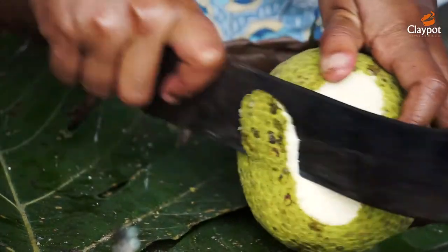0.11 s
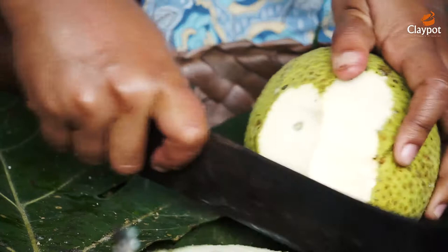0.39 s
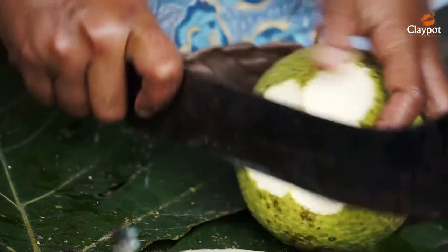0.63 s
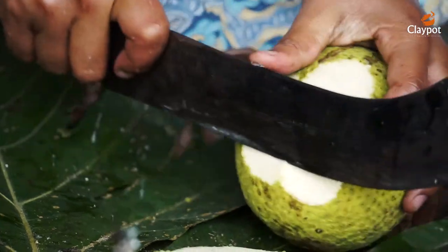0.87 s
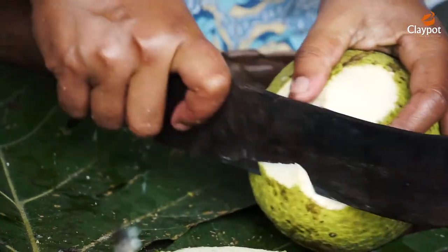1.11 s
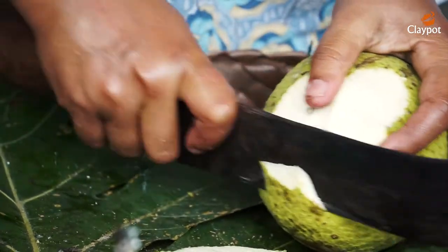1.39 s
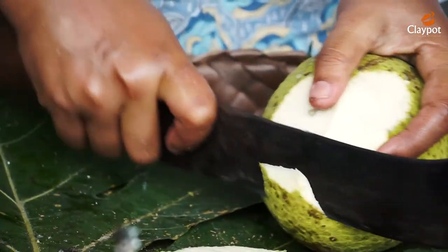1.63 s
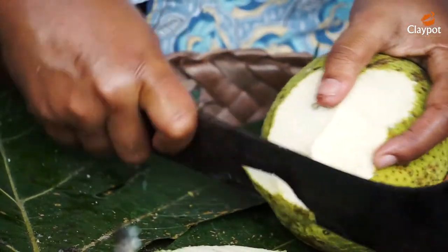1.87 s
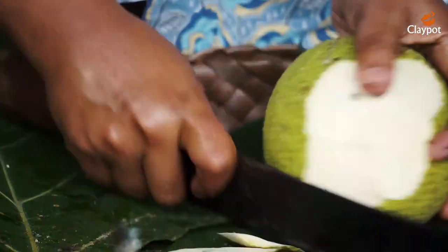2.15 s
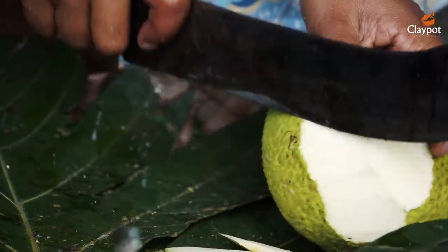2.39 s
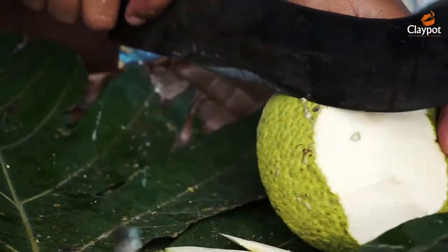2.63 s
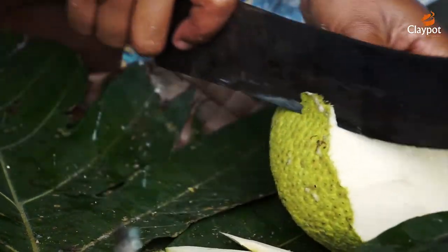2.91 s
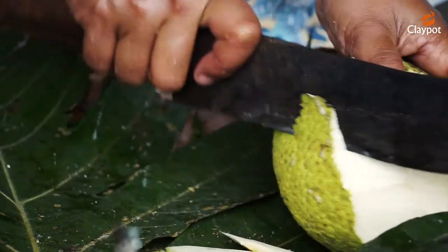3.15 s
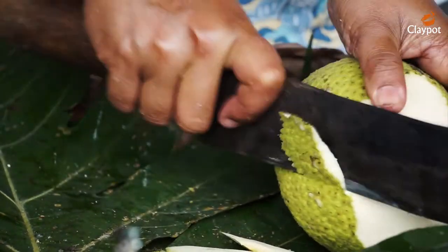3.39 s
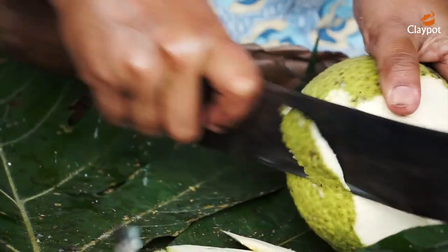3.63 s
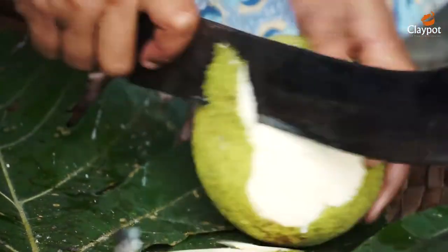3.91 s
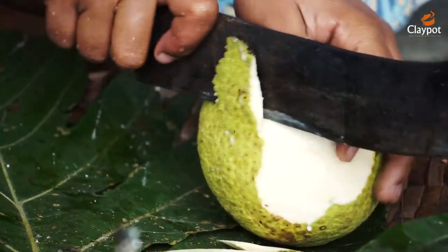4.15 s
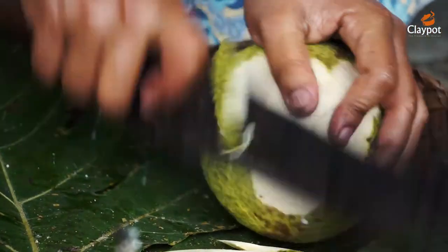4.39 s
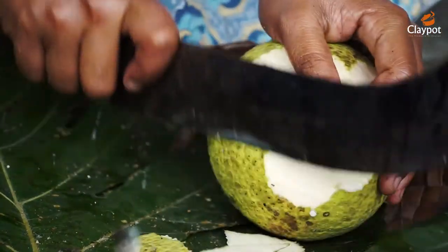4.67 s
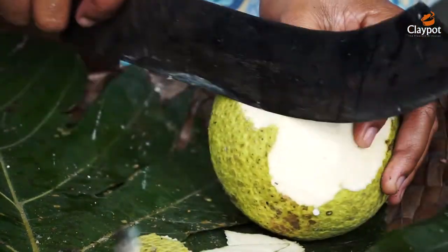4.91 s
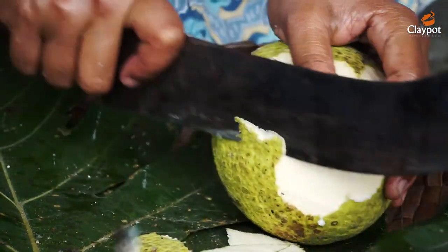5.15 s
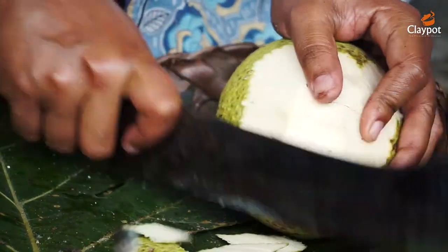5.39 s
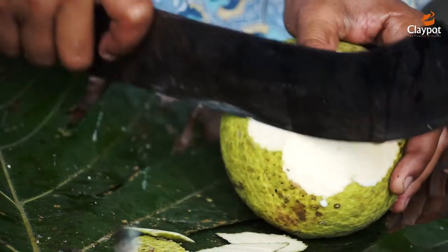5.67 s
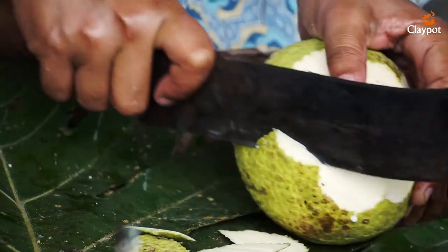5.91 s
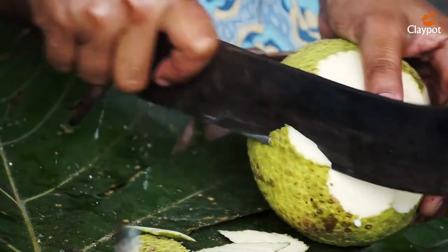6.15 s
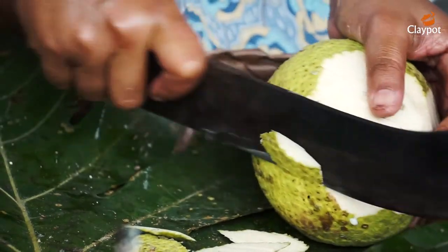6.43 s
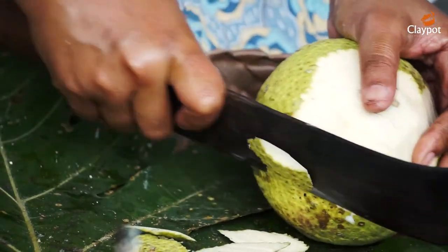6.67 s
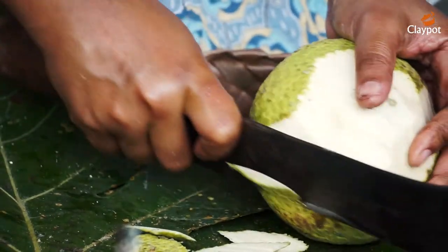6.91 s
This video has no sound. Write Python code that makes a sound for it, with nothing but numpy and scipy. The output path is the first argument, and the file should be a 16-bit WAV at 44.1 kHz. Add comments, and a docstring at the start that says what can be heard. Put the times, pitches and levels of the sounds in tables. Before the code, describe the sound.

Outdoors, a dense high insect chorus flutters steadily over soft air hiss, wide around a close stereo microphone. A faint low coo opens, with light rind ticks and a scrape around 0.4 s. Hoarse whining notes, perhaps birds or insects, repeat from 0.8 to 2.6 s, with squeaks near 1.1 s and chopped cricket trills at 1.5, 2.0 and 2.5 s. A faint drone swells near 1 s. At 2.0 s the knife tears a slice with a crunchy snap, then crackles until 2.3 s. From 3 to 5.5 s the steel whines hoarsely. A short frog croak comes from the left at 3.4 s, snaps at 3.9, the loudest crack and dull thud at 4.47. A coo and second croak come around 5.1 s, another strong rip at 5.3. Afterwards cutting quiets; a distant drone rises near 6, a last croak at 6.6, cricket trills at 6.5 and 7 s.

```python
"""Insects fill the treble, a low coo swells far off and a hoarse groan near 900 Hz wavers behind.
Outdoors, close to a stereo microphone, a broad steel knife pares the rind off a firm fruit: torn cells rasp
as clumpy noise, the gliding steel sings as narrow hoarse bands, slices crack free and jolt the fruit's modes.
Hoarse notes near 3 kHz and 2.1 kHz, perhaps birds or insects, are narrow noise; a cricket trills in chopped
tones, a frog on the left croaks three times by pulsing a vocal sac, a harmonic drone passes, air hisses."""
import sys
import numpy as np
from scipy import signal
from scipy.fft import rfft, irfft, next_fast_len
from scipy.io import wavfile
from scipy.ndimage import map_coordinates

SR = 44100
rng = np.random.default_rng(int(sys.argv[2]) if len(sys.argv) > 2 else 0)


def transcribe(signal):
    """Save signal, clipped to [-1, 1], as a 16-bit WAV file at the path in sys.argv[1]."""
    frames = np.atleast_2d(signal).T
    limited = np.clip(frames, -1, 1)
    pcm = np.round(limited * 32767).astype(np.int16)
    wavfile.write(sys.argv[1], SR, pcm)


def natural_amplitude(level_db):
    """Convert a level in decibels to a linear amplitude factor, elementwise."""
    exponent = np.asarray(level_db, float) / 20
    return 10 ** exponent


N = 310905  # samples
T = np.arange(N) / SR  # s
SLOW = T[::32]  # control times, s


def unit(x):
    """Scaled to rms 1."""
    return x / np.sqrt(np.mean(x ** 2) + 1e-20)


def along(points, hz):
    """(frequency [Hz], value) points read on a log frequency axis."""
    f, v = np.transpose(points)
    return np.interp(np.log(hz + 1), np.log(f + 1), v)


def curves(rows):
    """One value per sample for each column after the time."""
    s, *cols = np.transpose(rows)
    return [np.interp(T, s, c) for c in cols]


def sounding(rows, fade):
    """1 between the first and last row, fading at both ends over fade seconds."""
    return np.clip(np.minimum(T - rows[0][0], rows[-1][0] - T) / fade, 0, 1)


def swells(rows):
    """Summed gain of (peak s, dB, rise s, fall s, value) events, and their value weighted by gain."""
    s, db, rise, fall, value = np.transpose(rows)[..., None]
    below_peak_db = 20 * np.maximum((s - SLOW) / rise, (SLOW - s) / fall)
    gain = natural_amplitude(np.maximum(db - below_peak_db, -300))
    total = gain.sum(0)
    return np.interp(T, SLOW, total), np.interp(T, SLOW, (gain * value).sum(0) / total)


def wobble(rate):
    """A smooth random curve, rate knots a second."""
    knots = rng.standard_normal(int(N * rate / SR) + 4)
    return np.interp(T, SLOW, map_coordinates(knots, [SLOW * rate]))


def filtered(x, response):
    """x filtered by a complex response of frequency."""
    m = next_fast_len(x.shape[-1] + 8192)
    spectrum = rfft(x, m) * response(np.fft.rfftfreq(m, 1 / SR))
    return irfft(spectrum, m)[..., :x.shape[-1]]


def modes(table):
    """Causal sum of (Hz, width Hz, dB) resonances with alternating signs."""
    def response(f):
        return sum((-1) ** k * natural_amplitude(db) * 1j * f * w / (c * c - f * f + 1j * f * w)
                   for k, (c, w, db) in enumerate(table))
    return response


def grit(shape, spread_db):
    """Dense clicks of uneven size."""
    return unit(rng.standard_normal(shape) * natural_amplitude(spread_db * rng.standard_normal(shape)))


# colour bands: edges [Hz], and each band's octaves from 4.5 kHz
BAND_EDGES_HZ, BAND_OCTAVES = [0, 700, 2000, 6000, SR], [-3, -2, 0, 1]


def tilted(x, tilt_db):
    """Rebalances four bands so the colour leans by about tilt_db per octave around 4.5 kHz."""
    edges = zip(BAND_EDGES_HZ, BAND_EDGES_HZ[1:])
    bands = filtered(x, lambda hz: np.array([(hz >= lo) & (hz < hi) for lo, hi in edges]))
    return sum(natural_amplitude(o * tilt_db) * band for o, band in zip(BAND_OCTAVES, bands))


# colour of tearing rind: (frequency [Hz], relative level [dB per Hz])
RIND_COLOUR = [(90, -53), (160, -16.5), (400, -9.5), (1000, -2), (3000, 1), (6000, -3), (9000, -2),
               (11500, -5.5)]
# edge resting in the rind between strokes: (time [s], level before flutter and tilt [dB])
CONTACT = [(0, -67), (.7, -68), (.9, -63), (1.3, -65), (1.9, -66), (2.5, -61), (2.9, -68), (3.4, -61),
           (3.7, -63), (4.05, -62), (4.3, -66), (4.65, -63), (4.95, -68), (5.5, -61), (5.7, -64),
           (6.15, -68), (7.05, -64)]
CONTACT_TILT_DB = 1.2  # per octave
# strokes of the edge through rind, levels before flutter and tilt:
# (peak time [s], level [dB], 20 dB rise [s], 20 dB fall [s], brightness [dB per octave])
STROKES = [(.38, -56, .15, .25, -2), (.57, -62, .04, .1, 0), (1.36, -63, .08, .1, 1),
           (2.015, -39.5, .04, .055, -1.5), (2.2, -52.5, .15, .09, 0), (2.3, -53, .04, .07, 2),
           (3.83, -54, .07, .08, 5), (3.945, -53, .05, .05, 2), (4.418, -49, .02, .035, 1),
           (4.478, -37, .03, .025, -3), (4.57, -49, .04, .04, -1), (5.14, -49, .11, .22, 1.5),
           (5.32, -34.5, .04, .035, -2.5), (5.43, -60, .08, .2, 0), (6.64, -60, .2, .1, 0)]


def rasp():
    """Cells of rind tear in clumps under the edge."""
    strokes, stroke_tilt_db = swells(STROKES)
    resting = natural_amplitude(curves(CONTACT)[0])
    tilt_db = (strokes * stroke_tilt_db + resting * CONTACT_TILT_DB) / (strokes + resting)
    tearing = unit(filtered(grit(N, spread_db=3.5), lambda hz: natural_amplitude(along(RIND_COLOUR, hz))))
    return (strokes + resting) * natural_amplitude(1.94 * wobble(70)) * tilted(tearing, tilt_db)


def small_body(x):
    """A small fruit radiates little deep bass."""
    return filtered(x, lambda hz: (1j * hz / (120 + 1j * hz)) ** 3)


# fibres snapping, crunch relative to its snap:
# (time [s], level before colouring [dB], treble tilt [dB per octave], crunch [dB], flap ring [Hz])
SNAPS = [(0.353, -47, 0, -12, 2000), (0.368, -50, 5, -12, 9000), (0.386, -43.5, -1, -10, 2210),
         (0.4294, -48, 1, -10, 7100), (0.5744, -56, 1, -4, 7000), (0.98, -55, -5.5, -6.5, 3080),
         (1.9976, -38, 6, -8, 1325), (2.0049, -33.5, 3, -6.5, 9700), (2.1519, -46.5, 2, -9, 6750),
         (2.2042, -49, -4, -5.5, 942), (2.2184, -38.5, -1, -7.5, 2650), (2.2404, -44.5, -3.5, -9, 2810),
         (2.2915, -41, 0.5, -6, 4050), (2.305, -40.5, 2, -6, 9000), (3.8143, -49.5, 9, -2.5, 3146),
         (3.9065, -39, 0, -9, 3804), (3.9373, -34.5, -1, -11.5, 2710), (4.4079, -39.5, 6.5, -3.5, 9800),
         (4.4574, -41.5, 5.5, -0.5, 9070), (4.4683, -19.5, 1, -9.5, 1390), (4.5627, -53, 2, -4, 8660),
         (4.57, -51, -2, -6, 1000), (5.1517, -38.5, 3, -13, 2700), (5.3012, -42, -3, -9, 5700),
         (5.3073, -34, 5, -15, 6140), (5.3153, -23, 6.5, -11, 2194)]


def snaps():
    """Each snap is a crack that swells and dies in milliseconds, then a crackling crunch."""
    cracks, t = np.zeros(N + SR), np.arange(SR // 5) / SR
    for s, db, tilt_db, crunch_db, ring_hz in SNAPS:
        crack = t / 0.0017 * np.exp(1 - t / 0.0012)
        crunch = natural_amplitude(crunch_db - 60 * t / 0.1) * (1 - np.exp(-t / 0.00087))
        flap = modes([(ring_hz, .2 * ring_hz, 7)])  # the loose flap of rind rings

        def colour(hz):
            lean_db = tilt_db * np.take(BAND_OCTAVES, np.searchsorted(BAND_EDGES_HZ[1:], hz))
            return natural_amplitude(along(RIND_COLOUR, hz) + lean_db) * (1 + flap(hz))

        burst = (crack + crunch) * rng.standard_normal(len(t))
        cracks[round(s * SR):][:len(t)] += natural_amplitude(db) * filtered(burst, colour)
    return small_body(cracks[:N])


# the fruit jolts as a slice breaks free: (time [s], level before the modes [dB])
JOLTS = [(1.9976, -50), (2.0049, -59), (4.4683, -42.5), (5.3073, -52), (5.3153, -43)]
# modes of the fruit: (frequency [Hz], mean relative level [dB], t60 [s])
FRUIT_MODES = [(176.6, 4, 0.13), (242, -3.5, 0.18), (409.6, 7.5, 0.068), (497, 7.5, 0.054), (755, 5, 0.065),
               (950, 21, 0.023), (1338, 18, 0.02)]


def jolts():
    """Each jolt rings the fruit's damped modes as a dull thud."""
    thuds, t = np.zeros(N + SR), np.arange(SR // 5) / SR
    for s, db in JOLTS:
        thud = sum(natural_amplitude(level + rng.normal(0, 1.4) - 60 * t / t60) * np.sin(2 * np.pi * hz * t)
                   for hz, level, t60 in FRUIT_MODES)
        thuds[round(s * SR):][:len(t)] += natural_amplitude(db) * thud * (1 - np.exp(-t / 0.0021))
    return small_body(thuds[:N])


def hoarse(gain, hz, width_hz):
    """Narrow noise whose centre glides; width is taken at half amplitude."""
    noise = rng.standard_normal((2, N))
    a, b = filtered(noise, lambda f: 1 / (1 + (2 * f / width_hz) ** 2))
    phase = 2 * np.pi * np.cumsum(hz) / SR
    return gain * natural_amplitude(1.5 * wobble(30)) * unit(a * np.cos(phase) + b * np.sin(phase))


# whine of the long deep cut: (time [s], level before flutter [dB], centre [Hz])
DEEP_WHINE = [(2.95, -76, 3250), (3.03, -67, 3250), (3.2, -62.5, 3160), (3.4, -61, 3150), (3.65, -67, 2950),
              (3.9, -58, 2950), (4.08, -61.5, 2950), (4.28, -59, 3050), (4.41, -70, 3100),
              (4.54, -56, 3050), (4.68, -68, 2880), (4.85, -56.5, 2970), (4.99, -67, 2990),
              (5.1, -54, 3020), (5.22, -62, 3000), (5.35, -59, 3080), (5.9, -76, 3050)]
DEEP_OCTAVE_DB = -6  # its overtone, relative
# hoarse high hiss of the blade, levels before flutter:
# (peak time [s], level [dB], 20 dB rise [s], 20 dB fall [s], centre [Hz])
HISS = [(.88, -68, .2, .5, 4300), (1.34, -70, .4, .3, 4550), (2.37, -60.5, .05, .3, 4720),
        (5.2, -60, .2, .2, 4150), (5.53, -65, .4, .4, 4750)]


def blade():
    """Stick and slip makes the steel sing in the long deep cut, a broad whine with an overtone, and hiss."""
    deep_db, deep_hz = curves(DEEP_WHINE)
    gain = natural_amplitude(deep_db) * sounding(DEEP_WHINE, fade=.03)
    deep = hoarse(gain, deep_hz, width_hz=520)
    overtone = natural_amplitude(DEEP_OCTAVE_DB) * hoarse(gain, 2 * deep_hz, width_hz=1100)
    return deep + overtone + hoarse(*swells(HISS), width_hz=650)


# short hoarse notes near 3 kHz, perhaps a bird or insect, levels before flutter:
# (peak time [s], level [dB], 20 dB rise [s], 20 dB fall [s], centre [Hz])
WHINING_NOTES = [(.3, -69, .1, .3, 3050), (.83, -65, .1, .15, 3230), (.97, -63.5, .07, .17, 3200),
                 (1.17, -63, .1, .2, 2966), (1.37, -58, .05, .22, 2945), (1.6, -57, .12, .17, 2820),
                 (1.81, -57, .09, .2, 2840), (2.19, -66, .2, .2, 2760), (2.4, -64, .12, .2, 2850),
                 (2.6, -66.5, .2, .5, 2770), (6.4, -70, .3, .3, 3100), (6.7, -64, .08, .2, 2920),
                 (6.9, -66.5, .15, .15, 2950)]


def whining_notes():
    """Short hoarse whining notes near 3 kHz, perhaps a bird or insect, as narrow swelling noise."""
    return hoarse(*swells(WHINING_NOTES), width_hz=330)


# hoarse squeaks near 2.1 kHz, probably a bird, levels before flutter:
# (peak time [s], level [dB], 20 dB rise [s], 20 dB fall [s], centre [Hz])
BIRD_SQUEAKS = [(1.045, -56, .04, .2, 2200), (1.14, -56.5, .12, .25, 2090), (1.26, -60, .2, .09, 2085),
                (5.1, -61, .05, .3, 2080), (5.38, -63, .3, .3, 2170)]


def bird_squeaks():
    """Hoarse squeaks near 2.1 kHz, probably a bird, as very narrow swelling noise."""
    return hoarse(*swells(BIRD_SQUEAKS), width_hz=130)


UPPER_HZ = (2850, 3500)  # upper resonance at start and peak
UPPER_DB = (-3, 1.5, 0)  # over the sac at start, three quarters of the build-up, peak
CROAK_RISE_DB, CROAK_LAST_DB = 22, 8  # swell over the whole build-up, and over its last quarter
CROAK_CUT_S = .013  # to fall 20 dB


def croak(s, db, build):
    """A croak swells while its upper resonance rises, then cuts off: rows of (s, dB, upper dB, upper Hz)."""
    low, high = UPPER_HZ
    return [(s - build - .005, -120, UPPER_DB[0], low),
            (s - build, db - CROAK_RISE_DB, UPPER_DB[0], low),
            (s - build / 4, db - CROAK_LAST_DB, UPPER_DB[1], high - (high - low) / 5),
            (s, db, UPPER_DB[2], high),
            (s + 4 * CROAK_CUT_S, db - 80, UPPER_DB[2], high)]


# croaks: (peak time [s], vocal sac level before placing [dB], build-up [s])
CROAKS = [(3.398, -39, .065), (5.085, -35.5, .09), (6.635, -37, .12)]
# vocal sac, before its response is squared: (frequency [Hz], width [Hz], relative level [dB])
SAC = [(1410, 390, 1), (1774, 630, 0)]
PULSES_HZ = 255  # mean throat pulse rate


def frog():
    """Throat pulses ring the vocal sac and an upper resonance that rises through the croak."""
    db, upper_db, upper_hz = curves([row for call in CROAKS for row in croak(*call)])
    cycle = np.cumsum(PULSES_HZ * (1 + .06 * wobble(100))) / SR
    pulses = np.diff(np.floor(cycle), prepend=0) * natural_amplitude(2 * wobble(200))
    source = unit(pulses) + .2 * rng.standard_normal(N)
    upper = 0
    for hz in (2800, 3150, 3500):  # cross-fading fixed resonances moves the pitch
        ring = unit(filtered(source, lambda f: modes([(hz, 620, 0)])(f) ** 4))
        upper = upper + np.clip(1 - np.abs(upper_hz - hz) / 450, 0, 1) * ring
    sac = unit(filtered(source, lambda f: modes(SAC)(f) ** 2))
    return natural_amplitude(db) * (sac + natural_amplitude(upper_db) * upper)


# one cricket's trills, levels before flutter:
# (start [s], length [s], second partial's peak level [dB], first partial over second [dB])
TRILLS = [(1.46, .26, -58, 3), (2.04, .14, -55.5, 3), (2.53, .24, -58, 1), (6.43, .18, -55.5, -1),
          (6.92, .2, -58, 1)]
CRICKET_HZ = 2780  # mean of the first partial


def cricket():
    """A slightly hoarse two-partial note chopped into about thirty pulses a second, swelling in each trill."""
    first, second = np.zeros((2, N))
    for s, length, db, first_db in TRILLS:
        chop = np.sin(np.pi * 29.3 * (SLOW - s)) ** 4
        swell = np.abs(np.sin(np.pi * np.clip((SLOW - s) / length, 0, 1))) ** .4
        gain = natural_amplitude(db) * np.interp(T, SLOW, swell * chop)
        first, second = first + natural_amplitude(first_db) * gain, second + gain
    phase = 2 * np.pi * np.cumsum(CRICKET_HZ * (1 + 0.00837 * wobble(120))) / SR
    return natural_amplitude(3.1 * wobble(25.04)) * (first * np.sin(phase) + second * np.sin(2 * phase))


# low hoarse groan in the background: (time [s], level before flutter [dB])
GROAN = [(0, -62), (.17, -73), (.37, -65), (.7, -82), (1.16, -62), (1.4, -73), (1.65, -70), (2, -78),
         (2.22, -64), (2.45, -68), (2.8, -71), (3.1, -79), (3.82, -90), (3.93, -67), (4.3, -84), (4.5, -62),
         (4.64, -63), (4.85, -85), (5.12, -67), (5.7, -69), (6.14, -72), (6.34, -63.5), (6.66, -72),
         (6.95, -67), (7.05, -70)]
GROAN_HZ = 905  # mean centre


def groan():
    """A low hoarse groan near 900 Hz, source unknown: narrow noise that wavers in pitch and level."""
    return hoarse(natural_amplitude(curves(GROAN)[0]), GROAN_HZ * (1 + .04 * wobble(6)), width_hz=254)


def tones(tables, partials, waver):
    """Slightly unsteady harmonic tones along pitch curves."""
    out = np.zeros(N)
    for rows in tables:
        fade = sounding(rows, fade=.06)
        on = fade > 0
        hz, db = curves(rows)
        phase = 2 * np.pi * np.cumsum((hz * (1 + waver * wobble(25)))[on]) / SR
        stack = sum(natural_amplitude(level + 3.5 * wobble(10)[on]) * np.sin(k * phase) for k, level in partials)
        out[on] += natural_amplitude(db[on]) * fade[on] * stack
    return out


# far drone: (start [s], time to the top [s], time after it [s], top pitch [Hz], top level before partials [dB])
DRONES = [(.87, .25, .5, 143.5, -86), (5.58, .4, 1.2, 147, -83)]
# its partials: (multiple of the pitch, mean relative level [dB])
DRONE_TONES = [(1, -3.5), (2, -11), (3, -8), (4, -11.5), (5, 11.5), (6, -10), (7, 9)]
DRONE_START_HZ, DRONE_SAG_HZ_PER_S = 117, 19
DRONE_RISE_DB, DRONE_FADE_DB_PER_S = 12, 4


def drone():
    """Harmonic tones whose pitch and level climb to a top, then sag."""
    tables = [[(s, DRONE_START_HZ, db - DRONE_RISE_DB),
               (s + up, hz, db),
               (s + up + down, hz - DRONE_SAG_HZ_PER_S * down, db - DRONE_FADE_DB_PER_S * down)]
              for s, up, down, hz, db in DRONES]
    return tones(tables, DRONE_TONES, waver=0.00603)


# low coo: (start [s], length [s], mean pitch [Hz], level at its end before fade and flutter [dB])
COOS = [(0, .34, 338, -72), (4.99, .31, 335, -72)]
COO_SWELL_DB = 11


def coo():
    """A single tone on a level pitch that swells towards its end."""
    tables = [[(s, hz, db - COO_SWELL_DB), (s + length, hz, db)] for s, length, hz, db in COOS]
    return tones(tables, [(1, 0)], waver=0.019)


# likeness of left and right in the open: (frequency [Hz], correlation)
ALIKE = [(60, 1), (130, 0.67), (270, -0.11), (2500, -0.77), (5300, -0.46), (11000, -0.11)]
# left over right in the open: (frequency [Hz], level [dB])
LEAN = [(100, 0.16), (600, -1.6), (3000, 0.68), (11000, -2.3)]


def wide(colour):
    """A diffuse stereo field of the given colour, scaled to rms 1."""
    size = next_fast_len(N)
    hz = np.fft.rfftfreq(size, 1 / SR)
    turn = np.arccos(np.clip(along(ALIKE, hz), -1, 1)) / 2  # shares power between mid and side
    noise = rng.standard_normal((2, len(hz))) + 1j * rng.standard_normal((2, len(hz)))
    mid, side = noise * colour(hz) * [np.cos(turn), np.sin(turn)]
    tilt = natural_amplitude(np.outer([.5, -.5], along(LEAN, hz)))
    return unit(irfft(np.array([mid + side, mid - side]) * tilt, size)[:, :N])


# insect chorus, before flutter: (time [s], low singers [dB], middle singers [dB], high singers [dB])
CHORUS = [(0, -54.5, -65, -62), (.5, -55.5, -61, -59.5), (.95, -55, -64, -63), (1.2, -56, -64, -74),
          (1.8, -54.5, -63, -63), (2.4, -55, -60, -64), (2.9, -55.5, -61.5, -76), (3.5, -55.5, -66, -62),
          (4.0, -55, -62, -63), (4.4, -55, -63, -66), (4.8, -56, -62, -78), (5.2, -55, -61, -72),
          (5.85, -56.5, -68, -61), (6.2, -56, -72, -75), (6.7, -55.5, -70, -68), (7.05, -55.5, -64, -62)]
# each group's song, before its response is squared: (frequency [Hz], width [Hz], relative level [dB])
SONGS = [
    [(6975, 610, 4), (7870, 450, -1.5)],
    [(8690, 650, 0)],
    [(9490, 380, 0)],
]


def insects():
    """Crowds of singers blur into narrow bands that flutter at several speeds."""
    out = 0
    for db, song in zip(curves(CHORUS), SONGS):
        flutter_db = 0.43 * wobble(6.5) + 1.13 * wobble(60)
        out = out + natural_amplitude(db + flutter_db) * wide(lambda hz: np.abs(modes(song)(hz)) ** 2)
    return out


# colour of the open air: (frequency [Hz], relative level [dB per Hz])
AIR_COLOUR = [(20, -38), (100, -25), (550, -8), (900, -11), (1500, -10.5), (2800, -13), (5600, -18.5),
              (6900, -6), (8200, -11), (9800, -11), (11500, -19)]
AIR_DB = -58  # mean level


def air():
    """Leaves and distance: a soft hiss under everything."""
    return natural_amplitude(AIR_DB + 0.23 * wobble(5)) * wide(lambda hz: natural_amplitude(along(AIR_COLOUR, hz)))


# scatter of the yard: (frequency [Hz], t60 [s])
YARD = [(300, 0.28), (2000, 0.21), (10000, 0.18)]


def yard(x):
    """Ground, leaves and walls scatter the sound back, treble dying first."""
    hz, t, z = signal.stft(rng.standard_normal((2, SR // 3)), SR, nperseg=256)
    decay = natural_amplitude(-60 * t / along(YARD, hz)[:, None])
    tail = signal.istft(z * decay, SR, nperseg=256)[1]
    delayed = np.pad(x, (130, 0))[None]
    return signal.oaconvolve(delayed, tail / np.linalg.norm(tail[0]), axes=1)[:, :N]


def late(x, samples):
    """x delayed by a possibly fractional number of samples."""
    return filtered(x, lambda hz: np.exp(-2j * np.pi * hz * samples / SR))


def placed(x, left_db, right_late, yard_db):
    """Stereo place: left over right in dB, samples by which the right port hears later, and scatter in dB."""
    direct = np.array([natural_amplitude(left_db / 2) * x, natural_amplitude(-left_db / 2) * late(x, right_late)])
    return direct + natural_amplitude(yard_db) * yard(x)


def scene():
    """The knife sits close to the microphone and a little right; frog, cricket, drone and coo are farther off."""
    knife = placed(rasp() + snaps(), left_db=-4.5, right_late=0.89, yard_db=-5)
    fruit = placed(jolts(), left_db=-1.0, right_late=1.9, yard_db=-11)
    hoarse_sounds = blade() + whining_notes() + bird_squeaks() + groan()
    hoarse_side = placed(hoarse_sounds, left_db=-3.0, right_late=2.8, yard_db=-2.5)
    pond = placed(frog(), left_db=3.5, right_late=18, yard_db=-9)
    grass = placed(cricket(), left_db=-1.2, right_late=3, yard_db=-4)
    far = placed(drone() + coo(), left_db=-0.5, right_late=10.4, yard_db=-2.5)
    return knife + fruit + hoarse_side + pond + grass + far + insects() + air()


def roll_off(x):
    """The treble ends steeply here."""
    return signal.sosfilt(signal.butter(12, 11690, fs=SR, output="sos"), x)


def record(dry):
    """The microphone channel passes almost nothing above a steep band limit near 11 kHz."""
    mix = filtered(dry, lambda hz: 1 / (1 + (hz / 11080) ** 300))
    return roll_off(mix)


dry = scene()
out = record(dry)
transcribe(out)
```